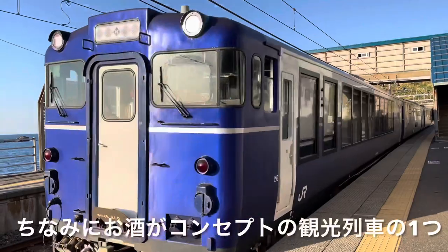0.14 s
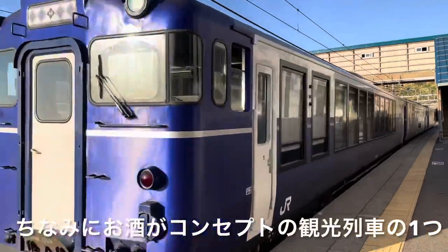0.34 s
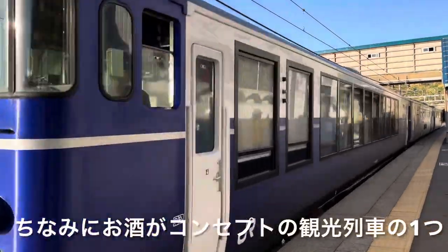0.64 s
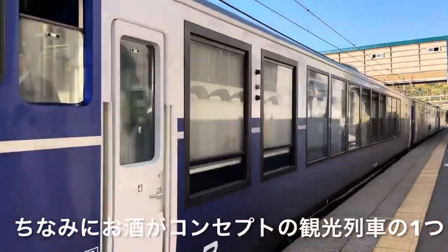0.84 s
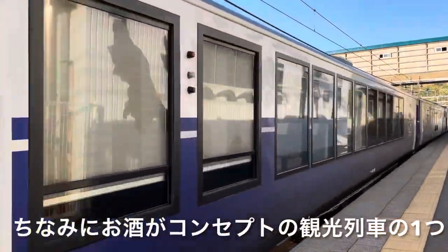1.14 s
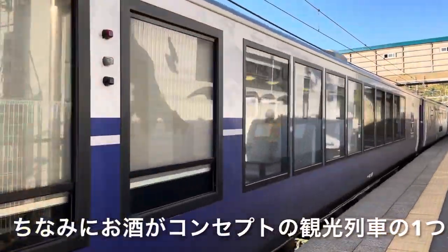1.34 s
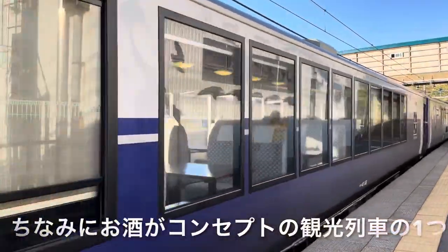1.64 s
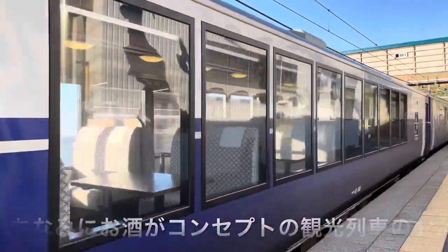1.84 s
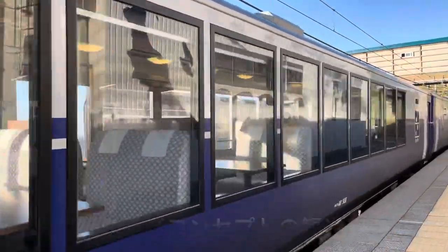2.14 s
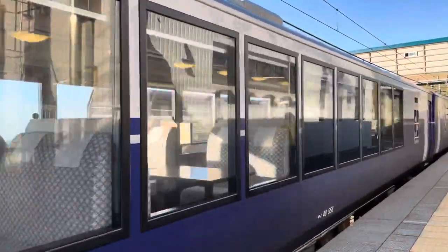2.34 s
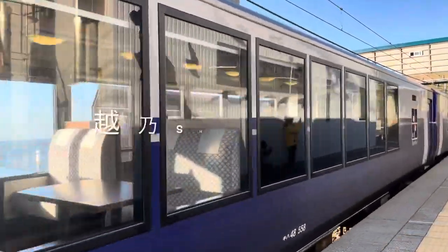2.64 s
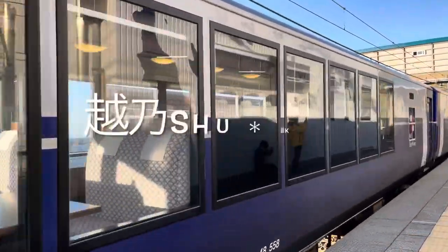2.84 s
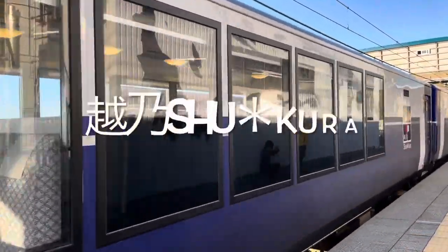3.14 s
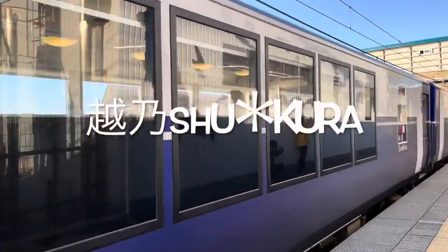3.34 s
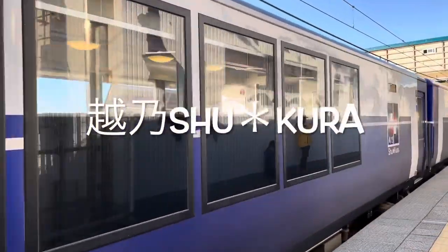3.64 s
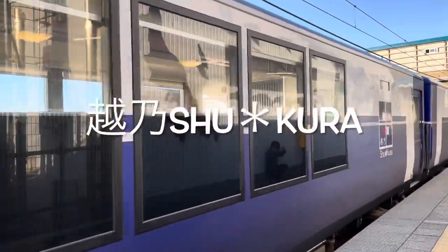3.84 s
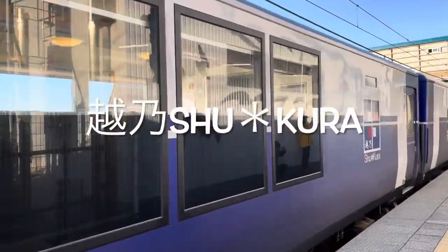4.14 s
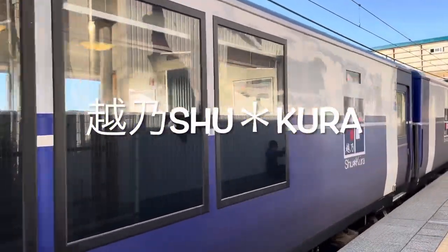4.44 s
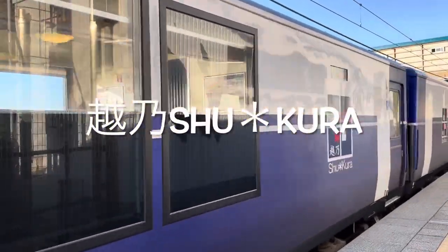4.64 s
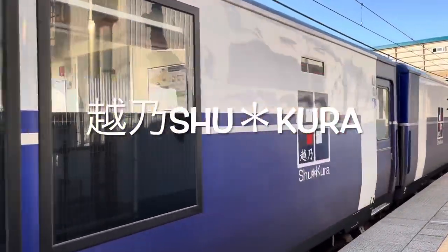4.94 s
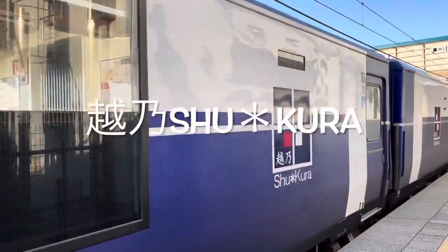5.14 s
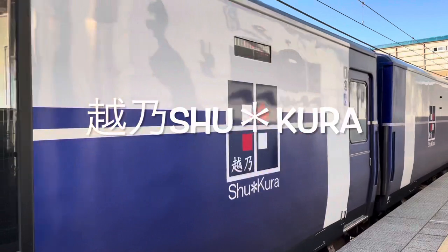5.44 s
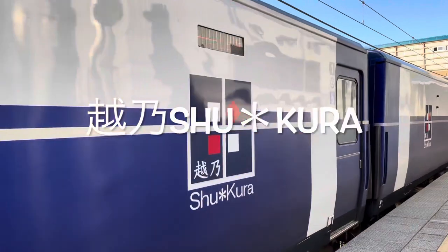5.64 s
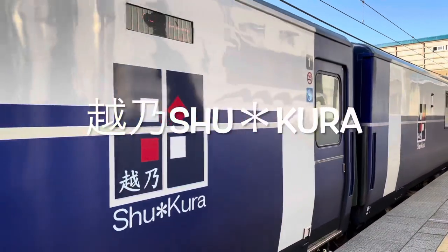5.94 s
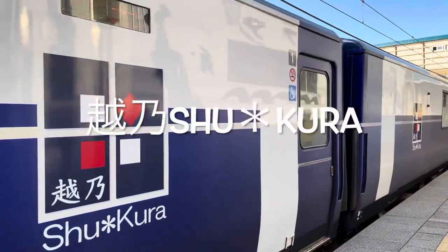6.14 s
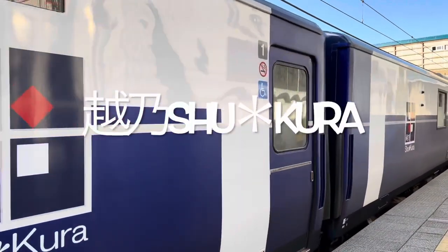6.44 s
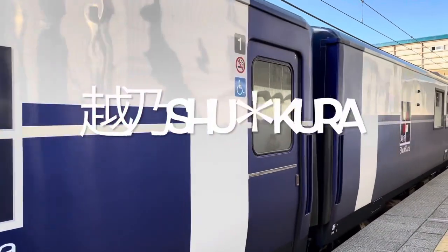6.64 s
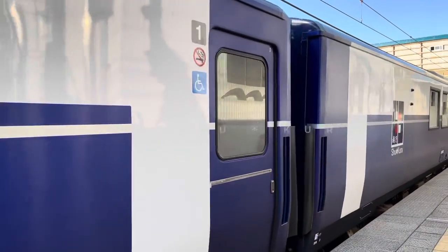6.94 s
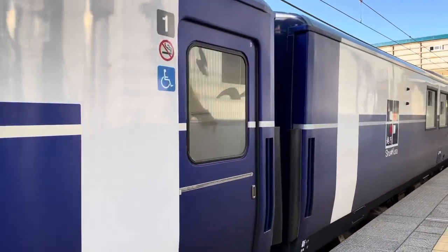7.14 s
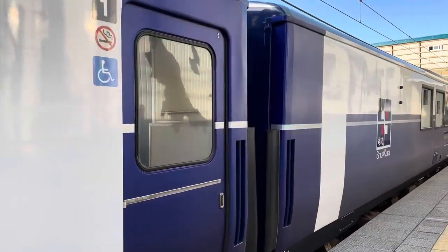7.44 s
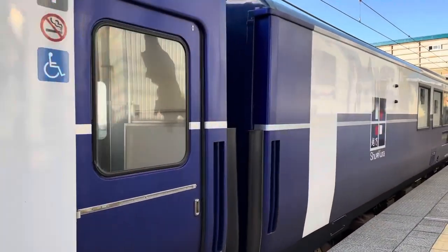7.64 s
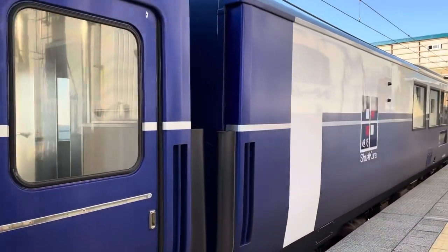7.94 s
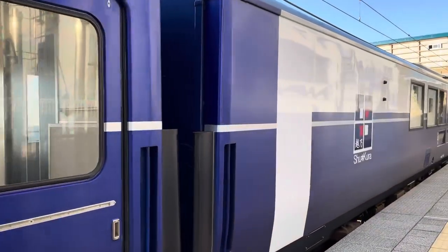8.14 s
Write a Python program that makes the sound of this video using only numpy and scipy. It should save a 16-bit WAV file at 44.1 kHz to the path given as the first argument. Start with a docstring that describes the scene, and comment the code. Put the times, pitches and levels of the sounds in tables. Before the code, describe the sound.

A diesel railcar rumbles slowly past a platform with soft thuds, then the rumble drops away and a piercing high brake squeal sings on, wavering.

```python
"""Braked railcar with a singing wheel

A diesel railcar slows along a platform. Shaped noise, hums and thuds rumble past and drop away after 3 s.
A braked wheel then sings near 6.8 kHz: a tone plus randomly fading echoes and a throbbing octave.
The echoes fade along the track, so they beat against the tone ever more slowly as the train slows.
Shoes scrape and chirp amid other broad bursts, all noise-driven bands; the leading brakes whistle and fizz."""
import sys
import numpy as np
from scipy import signal
from scipy.fft import next_fast_len
from scipy.io import wavfile
from scipy.ndimage import uniform_filter1d

SR = 44100
rng = np.random.default_rng(int(sys.argv[2]) if len(sys.argv) > 2 else 0)


def wrap_up_sound(samples):
    """Save the sound to the file named by the first command line argument, as 16-bit audio."""
    columns = np.atleast_2d(samples).T
    # keep every value between -1 and 1, then stretch to whole-number steps
    tamed = np.clip(columns, -1, 1)
    steps = np.round(tamed * 32767).astype(np.int16)
    wavfile.write(sys.argv[1], SR, steps)


N = 365171
TIME = np.arange(N) / SR
BINS = np.fft.rfftfreq(2048, 1 / SR)
FRAMES = np.arange(N // 512 + 5) * 512 / SR

# Course of each rumble layer as the train passes. Each: loudest level in dB, growth in dB/s,
# drop in dB, later fade in dB/s, floor in dB.
DRONE = (-46.5, .7, 15.6, 3.1, -72.5)
ROAR = (-39.5, 3, 21, 6, -76)
HISS = (-50.5, 3, 17.5, 3, -84)
FIRING_HZ = 75.5
# the rumble holds its top level until DROP_AT_S, then drops away over DROP_S
DROP_AT_S, DROP_S = 2.97, 1.15
# notes of the chirping wheels
LOW_HZ, MID_HZ, HIGH_HZ = 2975, 3396, 3830
# a faint narrow band above them
TOP_HZ = 5485


def squeal(echo_db=8.0, port_turn_rad=0.94, shared=0.13):
    """Each microphone port hears its own mix of echoes; in a swell the pure tone stands out of them."""
    # Each row: time in seconds, level between swells in dB, left minus right in dB.
    squeal_rows = [(0, -75.5, 2), (1.5, -65.5, 1), (2.0, -59.5, 3), (2.5, -46.5, 3), (2.72, -39, -0.5),
                   (3.0, -34.5, 2.5), (3.6, -35, 3.5), (4.0, -35.5, 3.5), (4.8, -35.5, -0.5),
                   (5.5, -37.5, -2.5), (5.9, -42, 2), (6.6, -40, 1.5), (7.2, -42, -3.5), (8.28, -43.5, 1)]
    # Octave: full at in seconds, full level in dB, swell in dB/s, settling in dB, settling time in seconds.
    octave_course = (3.5, -51.5, 28, 6.5, 4.5)
    # Octave throb: time of one crest in seconds, period in seconds, swing in dB at full depth.
    octave_throb = (4.89, 0.3895, 6.8)
    purity = .9  # dB that the echoes fall per dB of lift
    wander_hz, wander_per_s = 4, 3  # the grip wanders, and the pitch with it

    level_db, pan_db = curves(squeal_rows)
    lift_db, lean_db = swells()
    wander = wander_hz * evened(flutter(wander_per_s).real)

    tone_echo_db = echo_db - purity * lift_db
    ports = np.array([wheel_tone(1, tone_echo_db, skirt_per_m=26, lag_per_m=9, span_s=.07, wander=wander)
                      for _ in range(2)])
    ports = ports + shared * ports[::-1]  # some echoes reach both ports alike
    ports[0] *= np.exp(-1j * port_turn_rad)  # the direct tone reaches the left port later
    tone = amp(level_db + lift_db) * panned(pan_db + lean_db) * evened(ports.real)

    partial = wheel_tone(2, echo_db=3.5, skirt_per_m=42, lag_per_m=28, span_s=.25, wander=wander)
    octave = evened((partial * np.array([[np.exp(.15j)], [1]])).real)
    return tone + amp(singing(*octave_course)) * throb(*octave_throb) * octave


def wheel_tone(order, echo_db, skirt_per_m, lag_per_m, span_s, wander):
    """One partial of the wheel: a direct tone plus echoes whose Doppler shifts scale with the speed."""
    rest_hz, hz_per_m_per_s = 6779, 29.5  # the pitch sinks with the speed
    hz = rest_hz + hz_per_m_per_s * speed() + wander
    metres = np.cumsum(speed()) / SR
    # echoes arrive from the side, so they lie lower than the approaching wheel
    echoes = flutter(skirt_per_m, metres) * np.exp(-2j * np.pi * lag_per_m * metres)
    # the grip of the shoe is uneven: a faint wide fringe around the tone
    fringe = amp(-24) * flutter(98, metres)
    return steadied(1 + amp(echo_db) * echoes + fringe, span_s) * turning(order * hz)


def swells():
    """The squeal's irregular swells and short flares: round arches of lift and left-right lean in dB."""
    # Each row: start in seconds, end in seconds, lift in dB, lean to the left in dB.
    swell_rows = [(2.93, 3.218, 2.5, -0.5), (3.053, 3.092, 2.5, 2), (3.211, 3.581, 1, 1.5),
                  (3.432, 3.479, 7.5, 1), (3.606, 3.96, 3.5, -0.5), (4.943, 5.227, 2.5, 2.5),
                  (5.16, 5.181, 8, -6), (5.234, 5.505, 2.5, 1), (5.541, 5.86, 7, 4.5), (5.921, 6.034, 6, 3),
                  (6.012, 6.251, 6.5, -2), (6.144, 6.176, 6.5, -1), (6.27, 6.322, 6.5, -1),
                  (6.381, 6.612, 6.5, -1), (6.663, 6.908, 9, 3), (6.932, 7.183, 4, 3),
                  (7.269, 7.386, 8, 1.5), (7.453, 7.523, 12.5, 3), (7.504, 7.73, 7.5, -3.5),
                  (7.987, 8.032, 10, -14), (8.071, 8.149, 11, 0)]
    roundness = .8  # lower is squarer
    lift, lean = np.zeros(N), np.zeros(N)
    for start, end, lift_db, lean_db in swell_rows:
        phase = np.clip((TIME - start) / (end - start), 0, 1)
        arch = abs(np.sin(np.pi * phase)) ** roundness
        lift, lean = lift + lift_db * arch, lean + lean_db * arch
    return lift, lean


def singing(full_s, full_db, swell_db, settle_db, settle_s):
    """Level in dB of the octave: swell, settling hold, easing off."""
    ease_at_s, ease_db_per_s = 6.05, 2
    early, late = np.maximum(full_s - TIME, 0), np.maximum(TIME - full_s, 0)
    settled_db = settle_db * (1 - np.exp(-late / settle_s))
    eased_db = ease_db_per_s * np.maximum(TIME - ease_at_s, 0)
    return full_db - swell_db * early - settled_db - eased_db


def throb(crest_s, period_s, depth_db):
    """Gain of a regular throb plus uneven swells spaced along the track, both deepening to the end."""
    deepen_from_s, full_depth_s = 2, 11  # full depth lies past the end
    uneven_db, uneven_per_m = 3.6, 21
    depth = np.clip((TIME - deepen_from_s) / (full_depth_s - deepen_from_s), 0, 1) ** 2
    uneven = np.tanh(evened(flutter(uneven_per_m, np.cumsum(speed()) / SR).real))
    regular_db = depth_db * np.cos(2 * np.pi * (TIME - crest_s) / period_s)
    return amp(depth * (regular_db + uneven_db * uneven))


def speed():
    """Speed of the evenly braking train in m/s."""
    start_m_per_s, braking_m_per_s2 = 3.39, .33
    return start_m_per_s - braking_m_per_s2 * TIME


def scrapes_and_chirps():
    """Shoes scrape broadly or chirp; among the broad rows are a hiss of air, a low rush and a faint murmur."""
    # Chirps on their notes, and a faint narrow band at TOP_HZ.
    # Each row: start in seconds, end in seconds, note in Hz, level in dB.
    chirp_rows = [(3.679, 4.158, TOP_HZ, -79.5), (4.256, 4.652, TOP_HZ, -83), (4.95, 5.157, TOP_HZ, -79.5),
                  (5.852, 5.978, MID_HZ, -68.5), (6.098, 6.29, MID_HZ, -73), (6.2, 6.238, MID_HZ, -64),
                  (6.44, 6.48, HIGH_HZ, -76), (6.44, 6.476, LOW_HZ, -72), (6.595, 6.72, HIGH_HZ, -75.5),
                  (6.747, 6.86, HIGH_HZ, -79), (6.919, 7.008, HIGH_HZ, -80.5),
                  (6.689, 6.735, LOW_HZ, -64.5), (6.598, 6.998, LOW_HZ, -76.5), (6.996, 7.108, MID_HZ, -75),
                  (7.145, 7.215, MID_HZ, -78.5), (7.133, 7.235, LOW_HZ, -79), (7.41, 7.476, LOW_HZ, -74.5),
                  (7.45, 7.786, MID_HZ, -82.5), (7.524, 7.596, MID_HZ, -70.5),
                  (7.658, 7.703, MID_HZ, -71.5), (7.939, 8.098, LOW_HZ, -74.5)]
    # Scrapes, air hiss (11440 Hz), low rush (653 Hz), faint murmur (759 Hz).
    # Each row: start in seconds, end in seconds, centre in Hz, width in Hz, level in dB.
    broad_rows = [(0, 0.35, 2590, 90, -63), (1.032, 1.957, 11440, 1400, -63.5),
                  (1.201, 1.8, 4130, 260, -61), (2.1, 3.201, 4220, 1600, -70),
                  (3.58, 3.746, 653, 500, -57.5), (4.997, 5.12, 4100, 90, -79),
                  (4.79, 5.7, 2209, 150, -80.5), (4.79, 5.601, 2450, 130, -78),
                  (4.918, 5.803, 2710, 169, -85), (5.602, 6.305, 2480, 350, -81.5),
                  (5.999, 6.997, 759, 262, -85), (6.448, 7.2, 3420, 500, -83.5)]
    # Each envelope: rise in seconds, tail in seconds, judder in dB, pitch waver in Hz, halo in dB.
    chirp_envelope = (.02, .026, 2.6, 16, -6.5)
    broad_envelope = (0.17, 0.08, 3.5, 15, -12.5)
    chirp_width_hz = 33
    chirps = sum(burst(start, end, hz, chirp_width_hz, db, *chirp_envelope)
                 for start, end, hz, db in chirp_rows)
    return chirps + sum(burst(*row, *broad_envelope) for row in broad_rows)


def burst(start, end, hz, width_hz, db, rise_s, tail_s, judder_db, waver_hz, halo_db):
    """One randomly driven resonance rises, judders and wavers in a fuzzy halo, then rings out."""
    judder_per_s, waver_per_s, halo_width_hz = 12, 38, 150
    out, on = np.zeros((2, N)), (TIME > start) & (TIME < end + .3)
    t = TIME[on]
    judder = evened(amp(judder_db * np.tanh(evened(flutter(judder_per_s, t).real))))
    envelope = np.minimum((t - start) / rise_s, 1) * np.exp(-np.maximum(t - end, 0) / tail_s) * judder
    pitch = hz + waver_hz * evened(flutter(waver_per_s, t).real)
    halo = amp(halo_db) * ringing(pitch, halo_width_hz, spread=1.0, t=t)
    core = steadied(ringing(pitch, width_hz, spread=0.71, t=t), 0.071)
    out[:, on] = amp(db) * envelope * (core + halo)
    return out


def leading_brakes(trim_db=1, halo_db=-4):
    """The leading bogie's thin throbbing whistle in a fuzzy halo, over a spray of treble straight ahead."""
    # Each row: time in seconds, whistle level in dB before trim_db and the final fade.
    whistle_rows = [(0, -62), (.11, -51.5), (.22, -56.5), (.39, -52.5), (.61, -57), (.68, -52), (.8, -54),
                    (1.08, -71), (1.6, -64), (2.05, -60.5), (2.45, -72), (3.1, -74)]
    # Spray colour. Each row: frequency in Hz, relative level in dB per Hz.
    fizz_colour = [(5000, -28), (6500, 11), (7500, 5), (8700, -24), (10500, 9.5), (12500, 5), (14300, 17.5),
                   (15000, -22)]
    # Spray course: loudest level in dB, growth in dB/s, drop in dB, later fade in dB/s, floor in dB.
    spray_course = (-65, 0, 17, 0.5, -93)
    whistle_hz = 13981
    fading = steadied(1 + .5 * flutter(28) + amp(halo_db) * flutter(130), 0.14)
    fade_out = np.clip((3.4 - TIME) / 0.53, 0, 1)
    whistle = evened((fading * turning(whistle_hz)).real) * fade_out
    spray = noise(amp(colour(fizz_colour))[:, None], patchy_db=1)[0]  # one channel feeds both sides
    return amp(curves(whistle_rows)[0] + trim_db) * whistle + amp(passing(*spray_course)) * spray


def rumble(clatter=0.021):
    """Engine drone, roar of the running gear and hiss; the firing strokes chop the upper two."""
    # Colours close and far. Each row: frequency in Hz, relative level in dB per Hz.
    near_colour = [(20, -41), (38, -10), (62, 2), (145, -8), (205, -6.5), (290, -14.5), (400, -7.5),
                   (480, -14.5), (820, -11), (1060, -17.5), (1400, -16.5), (2240, -18.5), (4200, -23),
                   (6300, -32), (9000, -71), (14000, -88.5)]
    far_colour = [(20, -34.5), (45, -4.5), (72, -4), (105, -10.5), (150, -10), (300, -11), (420, -13.5),
                  (750, -16.5), (1000, -20.5), (1400, -18), (1900, -24.5), (3300, -31), (4800, -28),
                  (6300, -43), (8500, -47.5)]
    near = nearness(FRAMES)
    shape = amp(colour(near_colour)[:, None] * near + colour(far_colour)[:, None] * (1 - near))
    # power shares of the bands, split near 130 Hz and 1800 Hz
    low = 1 / (1 + (BINS[:, None] / 130) ** 8)
    high = 1 - 1 / (1 + (BINS[:, None] / 1800) ** 8)
    strokes = 1 + clatter * turning(FIRING_HZ + 4 * flutter(7.0).real).real
    drone = amp(passing(*DRONE)) * noise(shape * np.sqrt(low), patchy_db=2.5)
    roar = amp(passing(*ROAR)) * noise(shape * np.sqrt((1 - low) * (1 - high)), patchy_db=1.0)
    hiss = amp(passing(*HISS)) * noise(shape * np.sqrt(high), patchy_db=2.0)
    return drone + strokes * (roar + hiss)


def passing(top_db, growth_db, drop_db, fade_db, floor_db):
    """Level in dB of one passing layer: growth until closest, hold, drop, slow fade to a floor."""
    closest_at_s = 2.205
    before = np.maximum(closest_at_s - TIME, 0)
    after = np.maximum(TIME - DROP_AT_S - DROP_S, 0)
    return np.maximum(top_db - growth_db * before - drop_db * dropped() - fade_db * after, floor_db)


def dropped():
    """How far the rumble has dropped away, 0-1, steeply at first."""
    steepness = 2.0
    return 1 - np.clip(1 - (TIME - DROP_AT_S) / DROP_S, 0, 1) ** steepness


def nearness(t=TIME):
    """Share of the close colour, 0-1: it rises until the drop and is lost in it."""
    first, top, after = 0.65, 0.84, 0.06
    return np.clip(np.interp(t, [0, DROP_AT_S, DROP_AT_S + DROP_S], [first, top, after]), 0, 1)


def noise(gain, patchy_db):
    """Stereo noise of a given time-frequency shape, with drifting patches."""
    # Each row: time in seconds, share of the rumble from the left (0-1), the rest from ahead.
    swing = [(0, .25), (2.0, .35), (2.8, .7), (3.6, .95), (6.1, .85), (6.6, .5), (8.28, .6)]
    # Each row: frequency in Hz, left-right likeness (0-1).
    likeness = [(100, .998), (160, .97), (300, .92), (600, .6), (1000, .55), (1700, .65), (2700, .65),
                (5000, .45)]
    # Each row: frequency in Hz, left minus right in dB.
    balance_db = [(150, .2), (300, .5), (550, 3.2), (1000, 3.2), (2000, 1.4), (5000, 1)]
    lag_ahead_s, lag_left_s = .00003, .00034  # delay at the right port

    a, b, c, d, patches = rng.standard_normal((len(FRAMES), len(BINS), 5)).T
    patches = evened(uniform_filter1d(uniform_filter1d(patches, size=16, axis=0), size=7, axis=1))
    # part of the train is ahead and part has passed: each has its own delay between the ports
    passed = curves(swing, FRAMES)[0]
    omega = 2 * np.pi * BINS[:, None]
    delay = (1 - passed) * np.exp(-1j * omega * lag_ahead_s) + passed * np.exp(-1j * omega * lag_left_s)
    same, left = colour(likeness)[:, None] * delay, a + 1j * b
    right = same * left + np.sqrt(1 - abs(same) ** 2) * (c + 1j * d)
    z = np.array([left, right])
    z = z * gain * amp(patchy_db * patches) * panned(colour(balance_db))[:, :, None]
    return evened(signal.istft(z, nperseg=2048, noverlap=1536)[1][:, :N])


def hums(firing_db=-4, unsteady=0.7):
    """The firing note, wavering whines of the drive and wheel ring follow the levels of the rumble layers."""
    # Engine and drive. Each row: frequency in Hz, width in Hz, level against the roar in dB,
    # change in dB once fully far.
    hum_rows = [(52.4, 6.3, -14, 3.5), (393, 99, -18.5, 2), (869, 13, -16, -8.5), (1187, 33, -23, -4.5),
                (1364, 63, -21.5, 2)]
    # Wheel resonances rung by rolling. Each row: frequency in Hz, width in Hz,
    # level against the hiss in dB once fully far.
    wheel_modes = [(3030, 50, -18), (3370, 32, -18.5), (4820, 150, -20.5)]
    drone_db, roar_db, hiss_db = passing(*DRONE), passing(*ROAR), passing(*HISS)
    far = 1 - nearness()
    fading = steadied(1 - unsteady + unsteady * flutter(6.5), 0.063)
    firing = amp(drone_db + firing_db) * evened((fading * turning(FIRING_HZ)).real)
    whines = sum(amp(db + far_db * far) * ringing(hz, width, spread=0.45) for hz, width, db, far_db in hum_rows)
    wheels = sum(amp(db) * ringing(hz, width, spread=0.29) for hz, width, db in wheel_modes)
    return firing + amp(roar_db) * whines + amp(hiss_db) * far * wheels


def drive(whine_echo_db=-4, boom_width_hz=42):
    """The whine of the drive, a clean tone with weak echoes, and the hollow boom under the cars."""
    # Each row: time in seconds, whine level in dB.
    whine_rows = [(0, -54), (.55, -62), (1.2, -49), (1.55, -49.5), (1.95, -60.5), (2.35, -47), (2.8, -45),
                  (3.05, -54.5), (3.8, -76), (8.28, -98)]
    # Each row: time in seconds, boom frequency in Hz, level in dB.
    boom_rows = [(0, 197.5, -52), (.9, 207.8, -48), (1.5, 191.7, -50), (2.7, 189, -49.5), (3.0, 195.4, -60),
                 (3.5, 198, -73.5), (4.3, 197, -68), (5.2, 198, -77.5), (5.9, 249.7, -81.5),
                 (6.7, 249.7, -79.5), (7.4, 246, -97.5)]
    whine_hz = 431
    echoes = flutter(9) + .5 * np.array([flutter(9) for _ in range(2)])
    whine = evened(((1 + amp(whine_echo_db) * echoes) * turning(whine_hz)).real)
    boom_hz, boom_db = curves(boom_rows)
    boom = steadied(ringing(boom_hz, boom_width_hz, spread=0.17), 0.13)
    return amp(curves(whine_rows)[0]) * whine + amp(boom_db) * boom


def thuds(rise_s=0.015, ring_s=0.036):
    """Wheels thud on the track: each blow builds up in the heavy car body and rings for a few cycles."""
    # Each row: start in seconds, level in dB before rise and decay, ring in Hz.
    thud_rows = [(0.106, -28, 72), (0.587, -34, 70.5), (0.602, -28.5, 103), (0.966, -45, 72),
                 (3.702, -47, 58.6)]
    out = np.zeros(N)
    for s, db, hz in thud_rows:
        age = np.maximum(TIME - s, 0)
        envelope = np.minimum(age / rise_s, 1) * np.exp(-age / ring_s)
        out += amp(db) * envelope * np.sin(2 * np.pi * hz * age)
    return out


def ringing(hz, width_hz, spread, t=TIME):
    """A randomly driven resonance in stereo; spread scales the echo that is opposite in the two sides."""
    direct, echo = flutter(width_hz / 2, t), spread * flutter(width_hz / 2, t)
    turn = np.exp(2j * np.pi * np.cumsum(hz * np.ones(len(t))) / SR)
    return evened((np.array([direct + echo, direct - echo]) * turn).real)


def flutter(width, at=TIME):
    """Random complex fading along the axis `at`, with exponential skirts of the given width."""
    per_unit = 6000  # points per second or metre
    rate = np.fft.fftfreq(next_fast_len(int((at[-1] - at[0] + 1) * per_unit)), 1 / per_unit)
    z = np.fft.ifft(np.exp(-abs(rate) / width + 2j * np.pi * rng.random(len(rate))))
    return evened(np.interp(at - at[0], np.arange(len(z)) / per_unit, z))


def steadied(z, span_s):
    """Takes the slow swells out of a fading, leaving its quick beats."""
    return z / np.sqrt(uniform_filter1d(abs(z) ** 2, int(span_s * SR)) + 1e-9)


def turning(hz):
    """Unit phasor that follows a pitch."""
    return np.exp(2j * np.pi * np.cumsum(hz * np.ones(N)) / SR)


def panned(db):
    """Left and right gains for a level difference."""
    gains = amp(np.array([db, -db]) / 2)
    return gains / np.sqrt(np.mean(gains ** 2, axis=0))


def colour(points):
    """A spectrum table at every frequency bin."""
    hz, value = np.transpose(points)
    return np.interp(np.log(BINS + 1), np.log(hz), value)


def curves(rows, t=TIME):
    """Every column of a table at the times t."""
    s, *columns = np.transpose(rows)
    return [np.interp(t, s, c) for c in columns]


def evened(x):
    """Scales to an rms of one."""
    return x / np.sqrt(np.mean(abs(x) ** 2) + 1e-20)


def amp(db):
    """Decibels to gain."""
    return 10 ** (np.asarray(db) / 20)


def scene():
    """The whole train, heard from the platform."""
    return squeal() + scrapes_and_chirps() + leading_brakes() + rumble() + hums() + drive() + thuds()


def record(dry, low_cut_hz=36, edge_hz=15200):
    """The microphone's low cut and the recorder's band limit."""
    cut = signal.sosfilt(signal.butter(4, low_cut_hz, "highpass", fs=SR, output="sos"), dry)
    band_limit = signal.firwin(511, edge_hz, window=("kaiser", 9), fs=SR)
    return signal.oaconvolve(cut, band_limit[None], "same")


dry = scene()
out = record(dry)
wrap_up_sound(out)
```